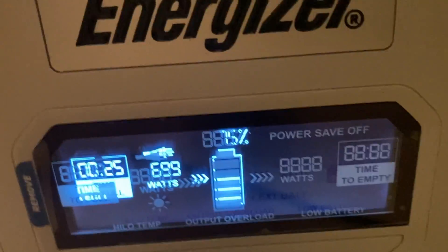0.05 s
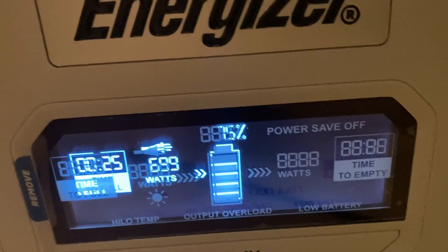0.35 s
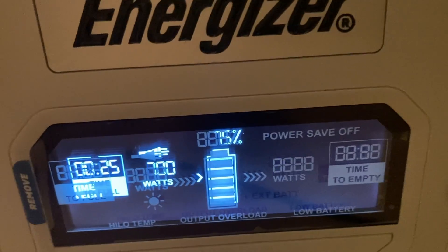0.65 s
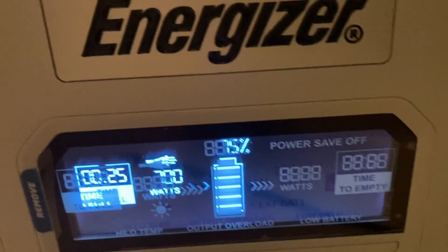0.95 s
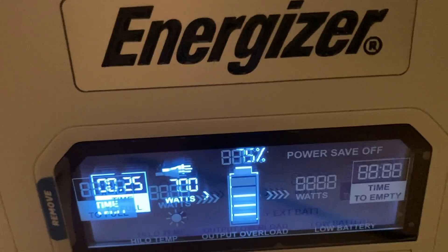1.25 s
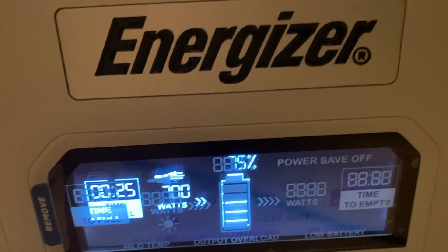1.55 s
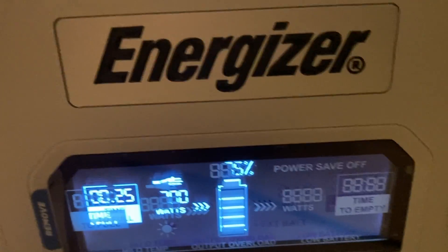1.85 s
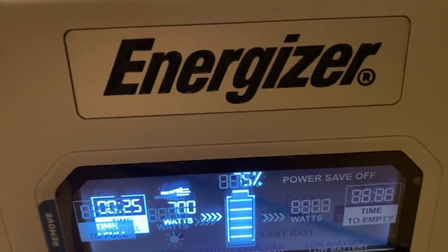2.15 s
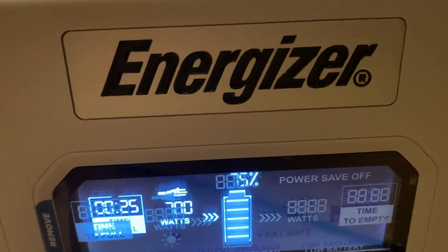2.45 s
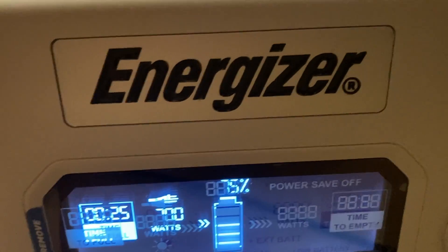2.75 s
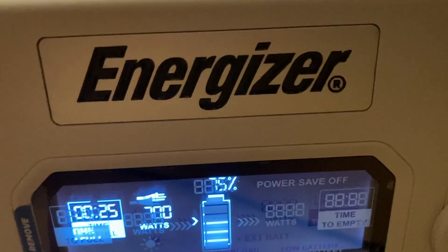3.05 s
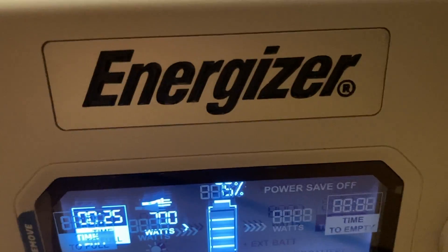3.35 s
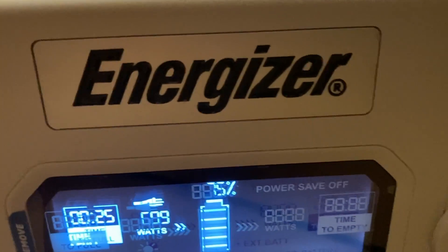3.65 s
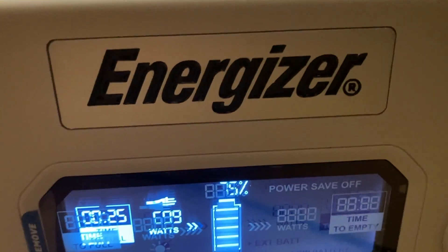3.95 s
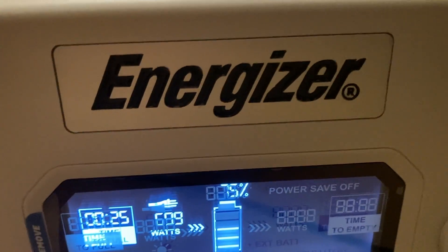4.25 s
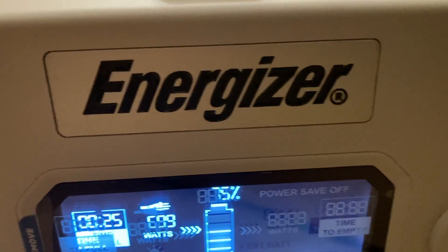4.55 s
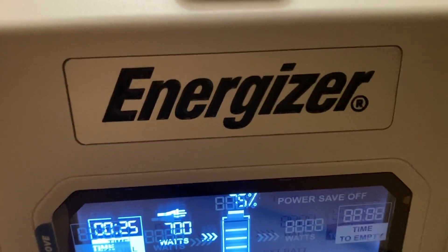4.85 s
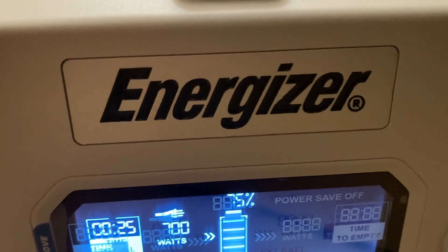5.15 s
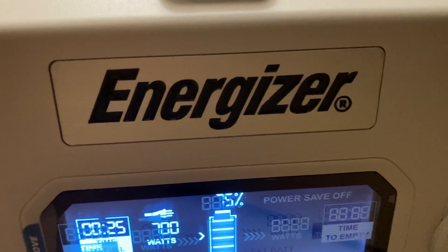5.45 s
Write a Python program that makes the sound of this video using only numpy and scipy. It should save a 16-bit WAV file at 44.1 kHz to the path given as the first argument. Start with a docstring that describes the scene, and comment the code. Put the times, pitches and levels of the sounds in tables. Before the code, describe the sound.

Small cooling fans spin up with a rising hum, then run steadily with a rush of air in a quiet room.

```python
"""Two small cooling fans spin up in the plastic case of a charging battery unit, close to the microphone.
Their blade tones glide upward and settle at almost the same pitch, the air rushes ever louder and
brighter through the vents, and the motors whirr faintly. The place is a quiet room with mains hum;
a low rumble and a few soft bumps come as from handling. The stereo microphone is in front of the case."""
import sys
import numpy as np
from scipy import signal
from scipy.fft import rfft, irfft, next_fast_len
from scipy.io import wavfile
from scipy.ndimage import uniform_filter1d, map_coordinates

SR = 44100
rng = np.random.default_rng(int(sys.argv[2]) if len(sys.argv) > 2 else 0)


def dump_mix(stems):
    """Bounce the given channels to the path in sys.argv[1] as a 16-bit WAV at rate SR."""
    frames = np.atleast_2d(stems).T  # one column per channel
    limited = np.clip(frames, -1, 1)  # hard clip at full scale
    pcm = np.round(limited * 32767).astype(np.int16)
    wavfile.write(sys.argv[1], SR, pcm)


N = 247401

# the fans: final blade-passing f/Hz, start t/s, spin-up time constant/s, base level/dB of tones 1 to 4
ROTORS = [(372.46, -.136, .6125, -40.2, -54.4, -70, -82), (362.38, -.135, .619, -51.5, -58.3, -55.8, -73.5)]
# blade tones 1 to 4: exponent of speed in the amplitude
BLADE_GROWTH = [2, 1.7, 1.9, 0.84]
# blade tones 1 to 4: factor on the lift from the case
BLADE_FLARE = [1.5, 0.73, .6, 1.1]
# swell and sag of blade tone 1: t/s, level/dB
FUNDAMENTAL_SWAY = [(.45, -1), (.6, 1.5), (.71, -2), (.82, -1), (.9, 0), (1.05, 1.5), (1.19, 1.5),
                    (1.29, 4), (1.42, -3.5), (1.6, 2), (2.1, 0.9), (2.7, 0.5), (5.6, -.5)]
# the same for tone 2: t/s, level/dB
SECOND_TONE_SWAY = [(.85, -7), (1.25, 6), (1.4, 2), (1.55, -3), (1.85, -6), (2.1, -3.5), (2.6, 0.5),
                    (5.6, 1)]
# the same for tones 3 and 4: t/s, level/dB
HIGH_TONE_SWAY = [(.6, -4), (.77, 6.5), (.95, -2.5), (1.3, -0.5), (1.75, -2), (2.05, 1.5), (2.4, 4),
                  (3, -7)]
# resonances and notches of case and vents: f/Hz, width/Hz, lift/dB
CASE_MODES = [(257.3, 6.9, 3.5), (300.5, 16.1, 4.5), (469, 79, 3), (711, 41.5, 6.5), (823, 22.7, 7.5),
              (920, 39, 7.5), (1119, 80, 11.5), (1292, 58.6, 8.5), (1677, 39, 4), (2420, 42, -0.5),
              (2900, 60, -0.5), (3530, 70, -1), (4600, 280, 4.5), (7100, 73, 2), (7850, 120, -2),
              (8300, 110, 2), (10400, 270, 2)]
# spectrum of the rush at full speed, before the case: f/Hz, relative level/dB
RUSH_SPECTRUM = [(22, -34), (32, -28), (48, -15.5), (150, -6), (300, 0), (550, -9), (1200, -23.5),
                 (1500, -20), (2400, -24), (4900, -33.5), (7000, -36.5), (10000, -45), (11700, -60.5),
                 (13000, -57.5), (15000, -60.5)]
# growth of the rush: f/Hz, exponent of air flow in the amplitude
RUSH_GROWTH = [(60, 0.72), (200, 1.76), (450, 1.8), (800, 2.34), (1200, 2.4), (1600, 3), (2500, 3.3),
               (5500, 4.9), (9000, 7.3), (13000, 21)]
# swells of the hollow drone: t/s, peak level/dB
DRONE_SWELLS = [(1.61, -45.5), (1.98, -43), (2.35, -39.5), (2.53, -41.5), (2.69, -41), (2.835, -36),
                (5.04, -41)]
# hoots as the rotors get going: t/s, f/Hz, peak level/dB
START_HOOTS = [(.12, 236.3, -48.5), (0.3, 198, -42)]
# spectrum of the motor whirr: f/Hz, relative level/dB
MOTOR_SPECTRUM = [(900, -21.5), (1200, -9), (1550, -12.5), (2080, 10.5), (2350, 2.5), (2700, -15),
                  (3300, -23), (3700, -9.5), (4600, -24.5), (8000, -44)]
# motor tones that climb with speed: final f/Hz, final level/dB
MOTOR_TONES = [(1270, -68.5), (2129, -75), (2341, -79.5)]
# thin tones of steady pitch: f/Hz, final level/dB
STEADY_WHINES = [(1658, -76.5), (3365, -81), (3928, -86), (7101, -91)]
# short, soft, dull bumps: t/s, half width/s, peak level/dB
BUMPS = [(2.344, .007, -34.5), (2.364, .006, -33.5), (2.828, .009, -39)]
# spectrum of a bump, before the case: f/Hz, relative level/dB
BUMP_SPECTRUM = [(80, -22), (170, -2.5), (330, 5.5), (550, -4), (950, -10.5), (1300, -22.5), (3000, -37),
                 (10000, -61)]
# low background rumble: f/Hz, relative level/dB
RUMBLE_SPECTRUM = [(20, -37.5), (30, -22), (42, -1.5), (56, -1.5), (95, 0.5), (150, -7), (210, -2.5),
                   (330, -14.5), (520, -22), (1100, -38.5), (1600, -46.5), (4000, -46.5), (13000, -58.5)]
# the rumble swells and sags, as from handling: t/s, level/dB
RUMBLE_SWELLS = [(.3, 0.5), (.6, -1.5), (.77, 5.5), (1.15, -2), (1.5, 4.5), (1.9, -1), (2.2, 4.5),
                 (2.4, -4.5), (3.2, -1), (3.45, 4), (3.65, 0.5), (4, 2), (5.3, 0.5), (5.6, -9.5)]
# mains hum: f/Hz, level/dB
MAINS_HUM = [(60, -58.5), (120, -57.5)]
# likeness of the noise in the left and right channels: f/Hz, coherence
CHANNEL_COHERENCE = [(60, 0.94), (300, 1), (550, 0.58), (750, .7), (950, 0.41), (1150, 0.66), (1500, 0.11),
                     (2300, 0.35), (3500, 0.25), (4800, 0.81), (5400, 1), (6000, 1), (7000, .8), (8500, 1),
                     (10200, 0.92), (11700, 1), (14000, .8)]
# lead of the left channel over the right: f/Hz, phase/rad
CHANNEL_PHASE = [(60, -0.17), (300, 0.59), (620, -1.2), (1300, -0.85), (1900, 0.8), (2700, 3.9), (3200, 4),
                 (3950, 2.5), (4600, 2.5), (5700, 3), (8500, 6.5), (11700, 8), (14500, 12.6)]
# left channel minus right: f/Hz, level/dB
CHANNEL_BALANCE = [(60, 3.5), (280, 1), (400, 4), (500, 6.5), (580, 7), (670, 2), (820, 2.5), (930, 2.5),
                   (1020, 4), (1130, 3), (1230, 1.5), (1350, 1), (1700, -3), (2500, 0.5), (3500, 0.6),
                   (4400, -2), (5500, 0)]


def blades(flutter_db=0.84, overtone_flutter_db=1.5, waver=0.00028):
    """Close up, each blade passing a strut pushes the air; the tones flare in the case and beat."""
    t = np.arange(N) / SR
    sway_tables = (FUNDAMENTAL_SWAY, SECOND_TONE_SWAY, HIGH_TONE_SWAY, HIGH_TONE_SWAY)
    sways = [np.interp(t, *np.transpose(rows)) for rows in sway_tables]
    grid_hz = np.arange(2000)
    case_db = case_lift(grid_hz)
    out = np.zeros(N)
    for full_hz, start, lag, *levels in ROTORS:
        spin = speed(t, start, lag)
        hz = full_hz * spin * (1 + waver * wobble(13))
        for k, (db, growth, flare, sway) in enumerate(zip(levels, BLADE_GROWTH, BLADE_FLARE, sways), 1):
            lift = flare * (np.interp(k * hz, grid_hz, case_db) - case_lift(k * full_hz))
            flutter = flutter_db * wobble(22.05) if k == 1 else overtone_flutter_db * wobble(14)
            out += spin ** growth * tone(k * hz, db + lift + sway + flutter)
    return out


def speed(t, start, lag):
    """Share of full speed: a rotor closes in on it exponentially."""
    return 1 - np.exp(-np.maximum(t - start, 1e-3) / lag)


def case_lift(hz):
    """The lift in dB that case and vents give to each frequency."""
    return sum(lift * bell(hz, centre, width) for centre, width, lift in CASE_MODES)


def rush(db=-37.5, patchy_db=1.0, start_s=0.035, lag_s=0.55):
    """Turbulent air at the vents, coloured by the case; treble grows with flow far faster than bass."""
    ripple = standing_waves()
    air = stereo_noise(lambda hz: along(RUSH_SPECTRUM, hz) + case_lift(hz) + along(ripple, hz))
    hz, t, spectra = signal.stft(air, SR, nperseg=1024)
    eddies = uniform_filter1d(rng.standard_normal(spectra.shape[1:]), size=14, axis=0)  # across pitch
    eddies = unit(uniform_filter1d(eddies, size=6, axis=1))  # and across time
    flow = speed(t, start_s, lag_s)  # the stream gets going just after the rotors
    gain = flow ** along(RUSH_GROWTH, hz)[:, None] * amp(patchy_db * eddies)
    return amp(db) * signal.istft(spectra * gain, SR, nperseg=1024)[1][:, :N]


def standing_waves(depth_db=1.2, spacing_hz=28, above_hz=1100):
    """Reflections leave fine, steady peaks and dips in the upper rush: f/Hz, level/dB."""
    hz = np.arange(1000) * spacing_hz
    return np.transpose([hz, depth_db * rng.standard_normal(len(hz)) * (hz > above_hz)])


def drone(db=-46.0, centre_hz=206, width_hz=14, growth=1.5, waver_db=2, swell_half_s=0.027):
    """Air stirs the lowest resonance of the case: it grows with fan speed, wavers and at times swells."""
    t = np.arange(N) / SR
    white = rng.standard_normal(N)
    band = unit(filtered(white, lambda hz: np.exp(-(.5 * (hz - centre_hz) / width_hz) ** 2)))
    ring = unit(band / (np.abs(signal.hilbert(band)) + 0.82))  # halfway between noise and a tone
    swells = sum(bell(t, at, swell_half_s) * tone(centre_hz, level) for at, level in DRONE_SWELLS)
    spin = speed(t, *ROTORS[0][1:3])
    return ring * spin ** growth * amp(db + waver_db * wobble(16)) + swells


def hoots(half_s=0.029, rise_hz_per_s=330):
    """Short rising hoots at set times: a blade tone sweeping through the lowest resonance."""
    t = np.arange(N) / SR
    return sum(bell(t, at, half_s) * tone(hz + rise_hz_per_s * (t - at), db)
               for at, hz, db in START_HOOTS)


def whistle(db=-60, hz=870, start_s=1.9, rise_s=0.66, creep_hz_per_s=18, flutter_db=2):
    """A faint whistle fades in late and creeps upward."""
    age = np.arange(N) / SR - start_s
    fade_in = np.clip(age / rise_s, 0, 1)
    return fade_in * tone(hz + creep_hz_per_s * age, db + flutter_db * wobble(7.1))


def whines(flutter_db=2):
    """Thin tones come up inside the rush: some hold their pitch, the motor tones climb with speed."""
    spin = speed(np.arange(N) / SR, *ROTORS[0][1:3])
    steady = sum(tone(hz, db + flutter_db * wobble(1.2)) for hz, db in STEADY_WHINES)
    climbing = sum(tone(hz * spin, db + flutter_db * wobble(5.5)) for hz, db in MOTOR_TONES)
    return steady * spin ** 5 + climbing * spin ** 2


def motors(strain_db=-67.5, ease_db=12.5, ease_from_s=0.67, release_s=0.67):
    """A thin whirr inside the case: it holds while the motors strain and eases near full speed."""
    t = np.arange(N) / SR
    attack = speed(t, start=0.032, lag=0.13)
    eased = np.clip((t - ease_from_s) / release_s, 0, 1)
    return attack * amp(strain_db - ease_db * eased) * stereo_noise(lambda hz: along(MOTOR_SPECTRUM, hz))


def bumps():
    """Short, soft, dull bumps, as from handling, coloured by the case."""
    t = np.arange(N) / SR
    envelope = sum(amp(db) * bell(t, at, width) for at, width, db in BUMPS)
    return envelope * stereo_noise(lambda hz: along(BUMP_SPECTRUM, hz) + case_lift(hz))


def hiss(db=-80, at_s=4.93, half_s=.09, centre_hz=14000, width_hz=1050):
    """A faint, very high hiss swells and fades once."""
    band = unit(filtered(rng.standard_normal((2, N)), lambda hz: bell(hz, centre_hz, width_hz)))
    return amp(db) * bell(np.arange(N) / SR, at_s, half_s) * band


def background(db=-50.0):
    """A low rumble swells and sags, as from handling, over the mains hum of the room."""
    rumble_db = db + np.interp(np.arange(N) / SR, *np.transpose(RUMBLE_SWELLS))
    rumble = amp(rumble_db) * stereo_noise(lambda hz: along(RUMBLE_SPECTRUM, hz))
    return rumble + sum(tone(hz, level) for hz, level in MAINS_HUM)


def stereo_image(hz):
    """Level and phase of the left and right channels; they are nearly opposite around 5.7 kHz."""
    lead = np.interp(hz, *np.transpose(CHANNEL_PHASE))
    left = amp(along(CHANNEL_BALANCE, hz) / 2) * np.exp(.5j * lead)
    return np.array([left, 1 / left])


def stereo_noise(colour):
    """Noise of rms 1 with a dB colour, its left and right channels partly unrelated."""
    def response(hz):
        spread = np.arccos(np.clip(along(CHANNEL_COHERENCE, hz), 0, 1)) / 2
        return amp(colour(hz)) * [np.cos(spread), np.sin(spread)]
    mid, side = filtered(rng.standard_normal((2, N)), response)
    return unit(np.array([mid + side, mid - side]))


def tone(hz, db):
    """A sine whose pitch and rms level may move."""
    cycles = np.cumsum(hz + np.zeros(N)) / SR + rng.random()
    return np.sqrt(2) * amp(db) * np.sin(2 * np.pi * cycles)


def wobble(rate):
    """A smooth random curve, rate knots a second."""
    knots = rng.standard_normal(int(N * rate / SR) + 4)
    return map_coordinates(knots, [np.arange(N) * rate / SR])


def filtered(x, response):
    """x through a complex frequency response."""
    size = next_fast_len(N + SR // 4)
    return irfft(rfft(x, size) * response(np.fft.rfftfreq(size, 1 / SR)), size)[..., :N]


def along(points, hz):
    """Rows of f/Hz, value, read on a log frequency axis."""
    freqs, values = np.transpose(points)
    return np.interp(np.log(hz + 1), np.log(freqs + 1), values)


def bell(x, centre, width):
    """A Gaussian hump of height 1."""
    return np.exp(-.5 * ((x - centre) / width) ** 2)


def amp(db):
    """Decibels to gain."""
    return 10 ** (np.asarray(db) / 20)


def unit(x):
    """Scaled to rms 1."""
    return x / np.sqrt(np.mean(x ** 2) + 1e-20)


def scene():
    """The fans close to the microphone and the background beneath them, in one stereo image."""
    close = blades() + hoots() + rush() + bumps() + drone() + whistle() + whines() + motors()
    return filtered(close + background() + hiss(), stereo_image)


def record(dry, top_hz=15000):
    """Nothing is kept above the band limit."""
    return filtered(dry, lambda hz: hz < top_hz)


dry = scene()
out = record(dry)
dump_mix(out)
```